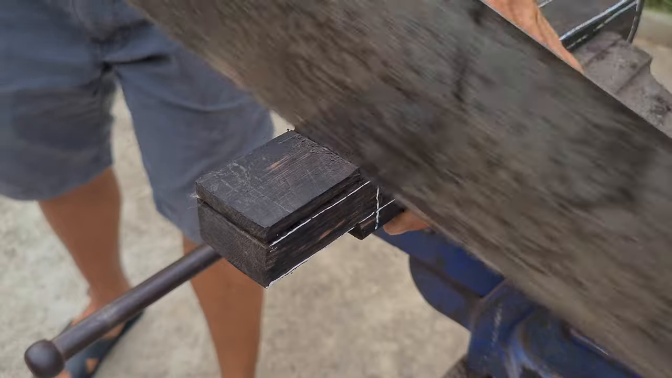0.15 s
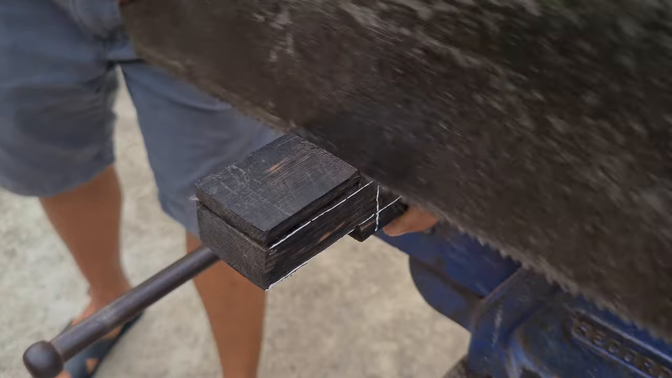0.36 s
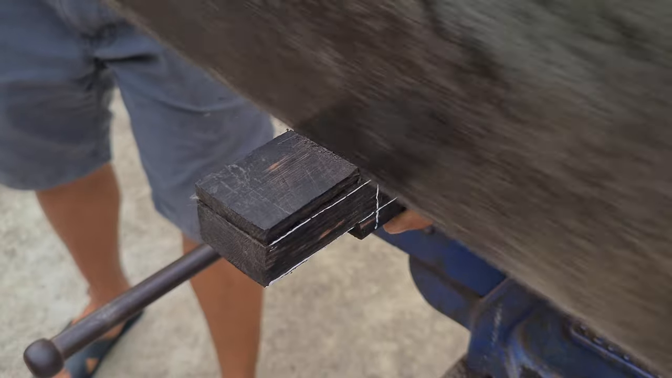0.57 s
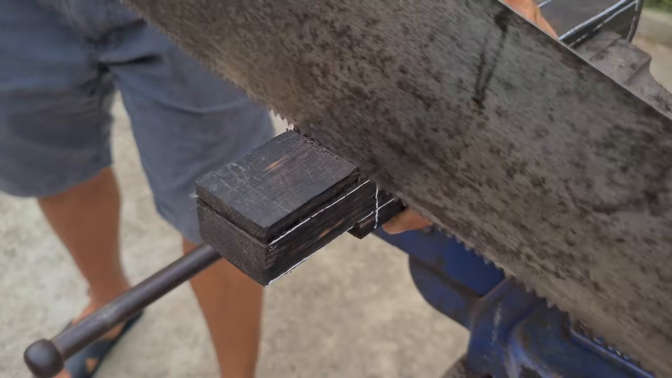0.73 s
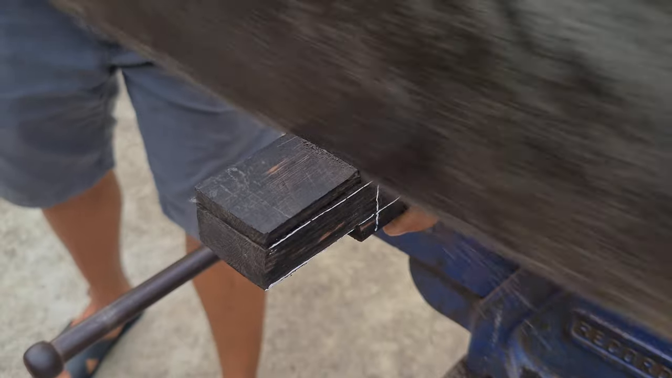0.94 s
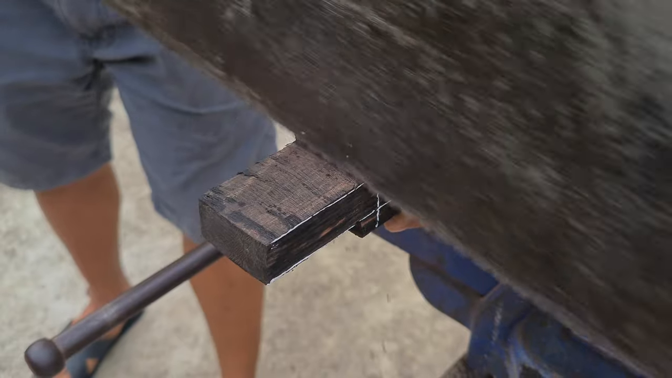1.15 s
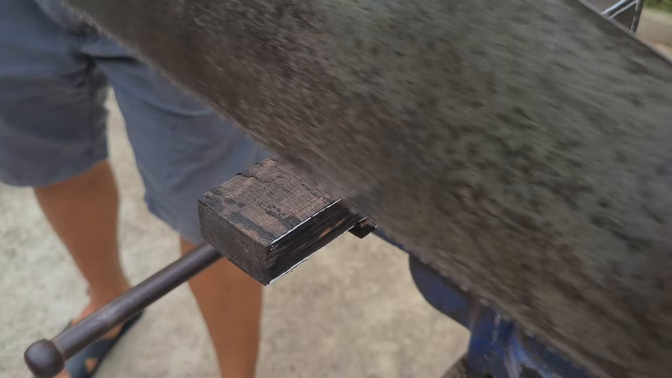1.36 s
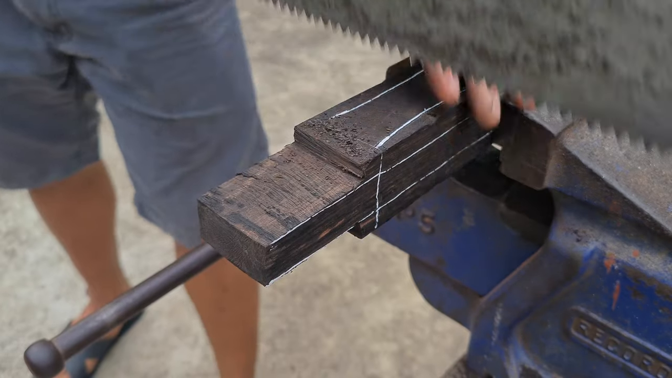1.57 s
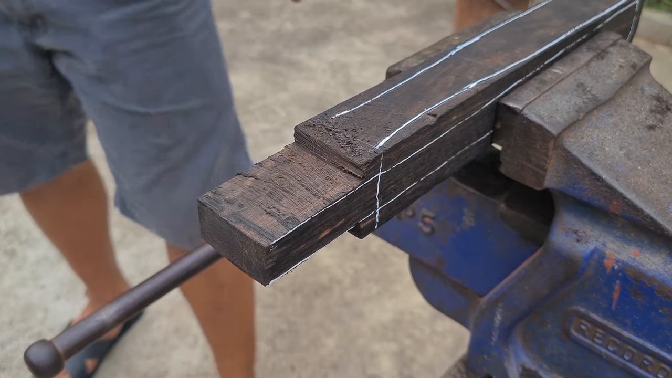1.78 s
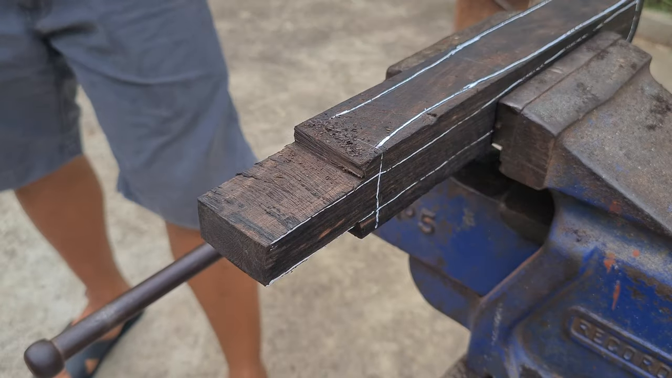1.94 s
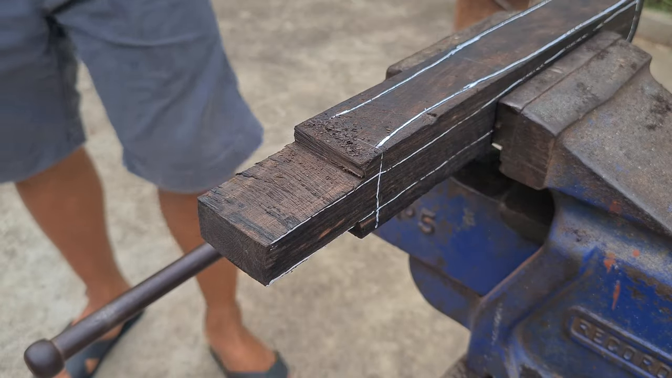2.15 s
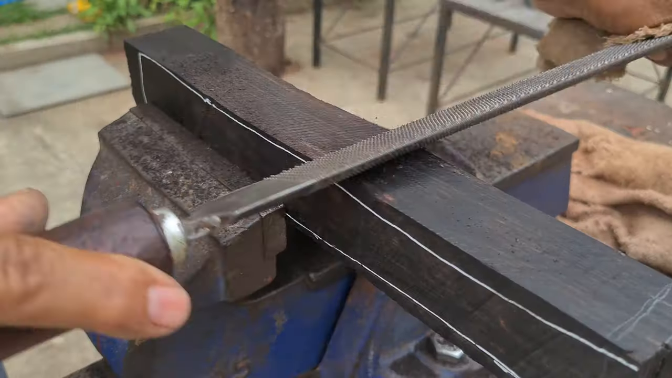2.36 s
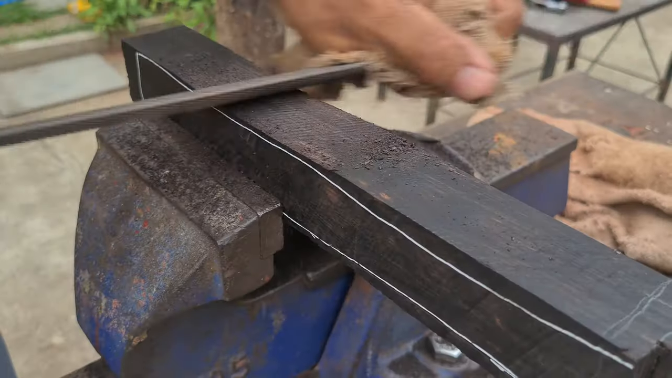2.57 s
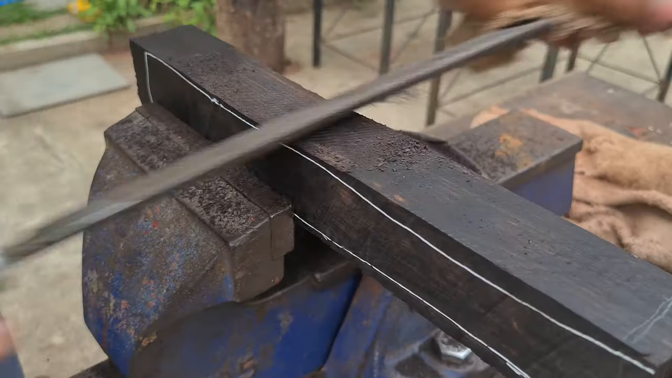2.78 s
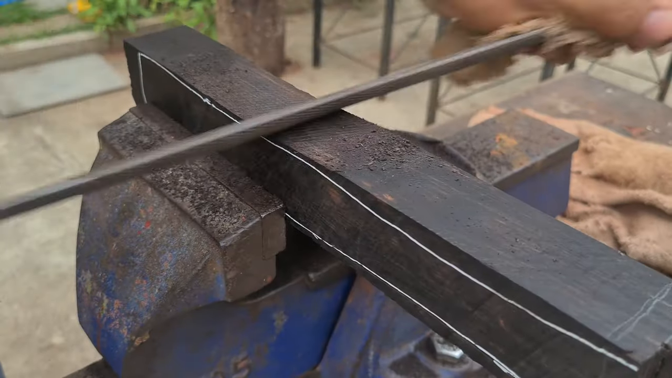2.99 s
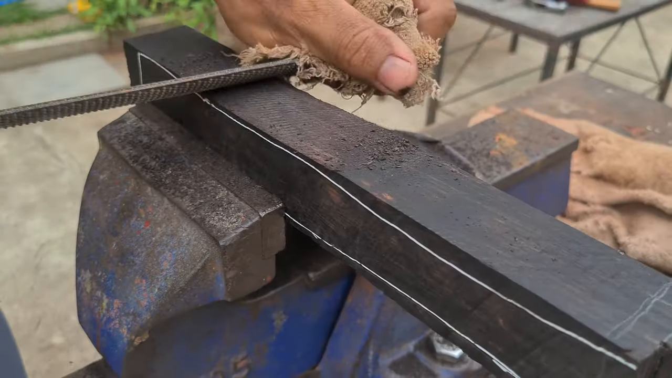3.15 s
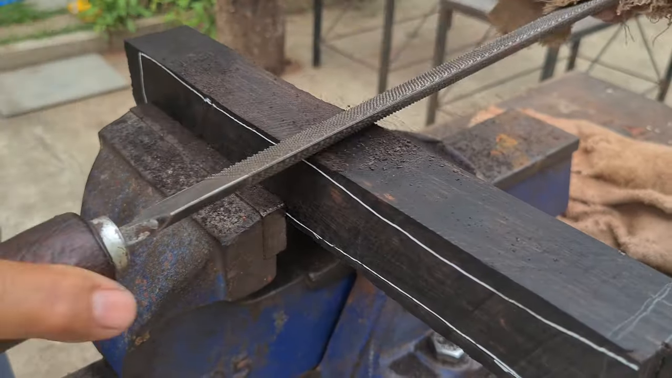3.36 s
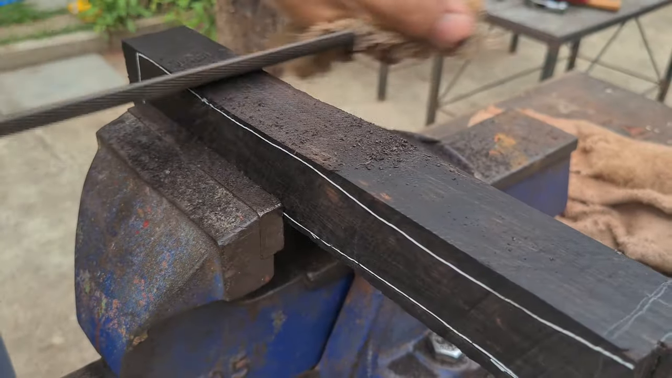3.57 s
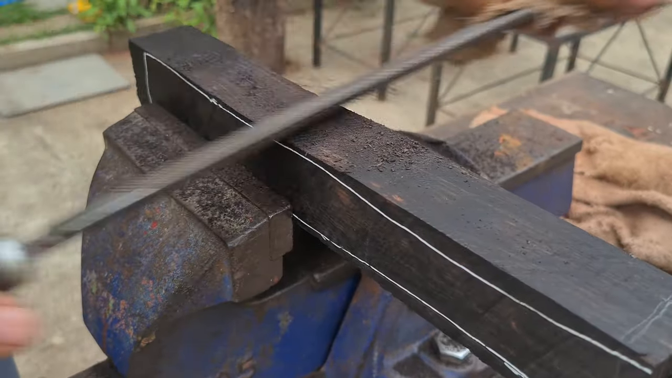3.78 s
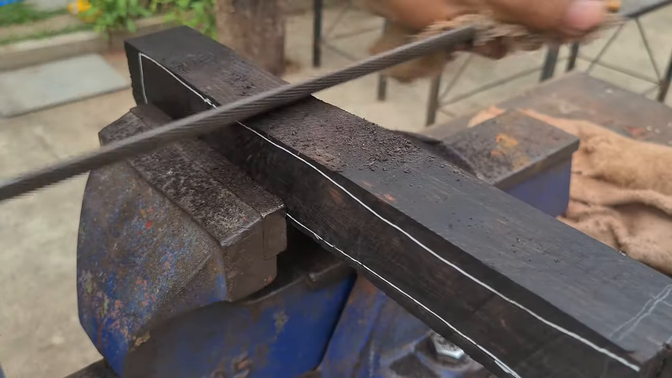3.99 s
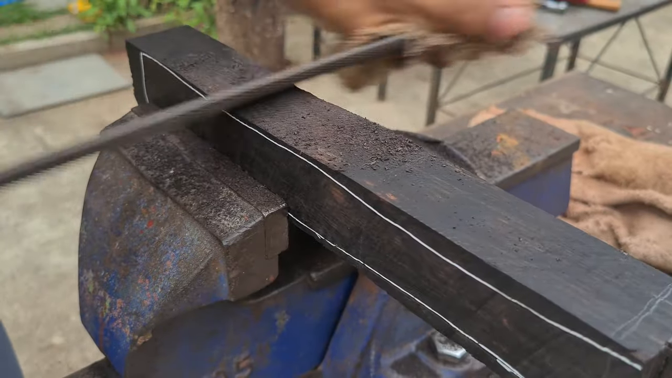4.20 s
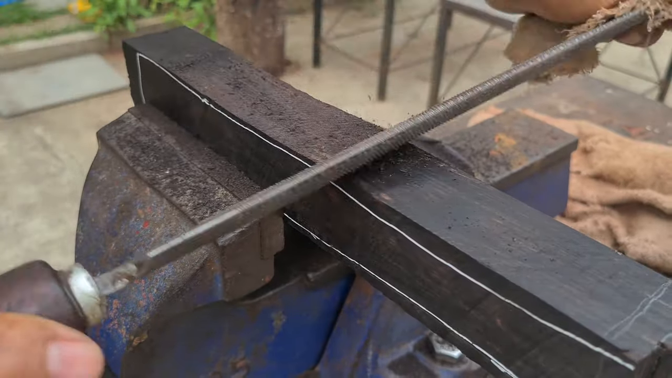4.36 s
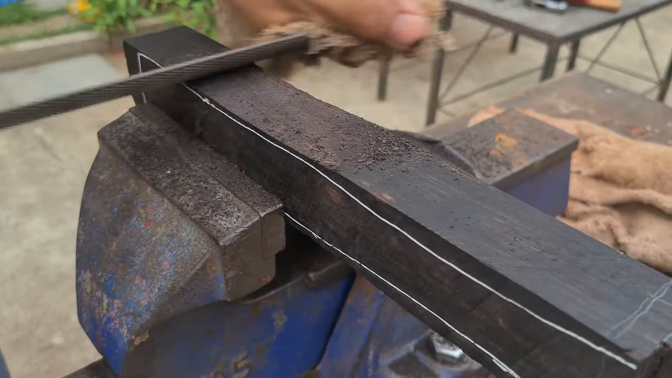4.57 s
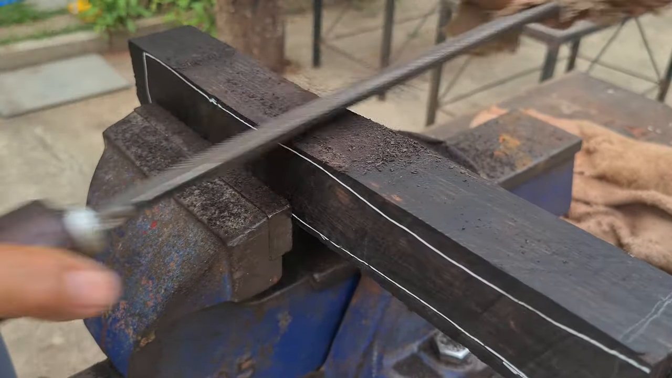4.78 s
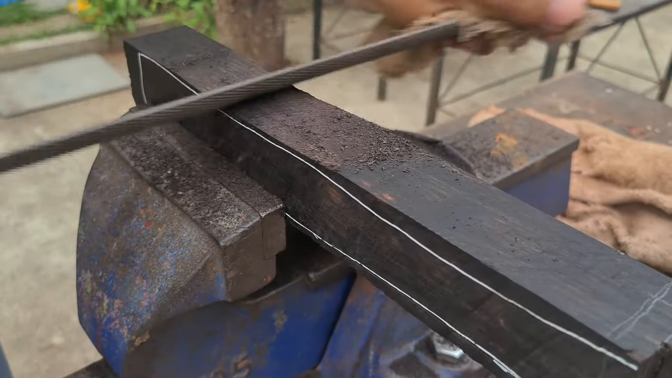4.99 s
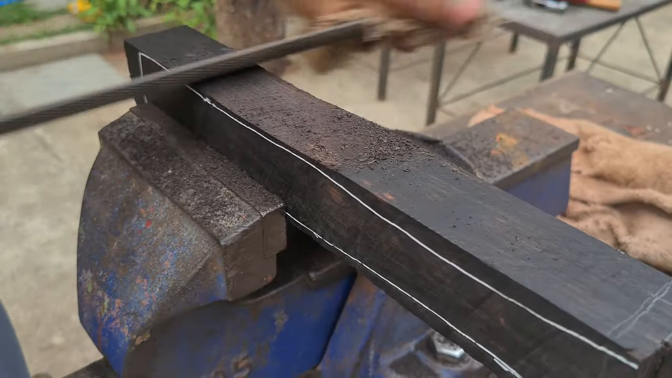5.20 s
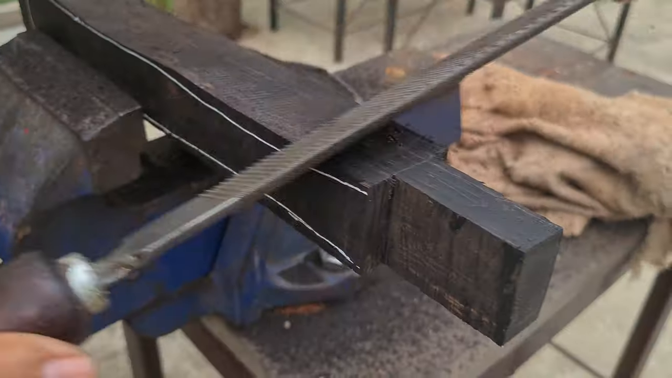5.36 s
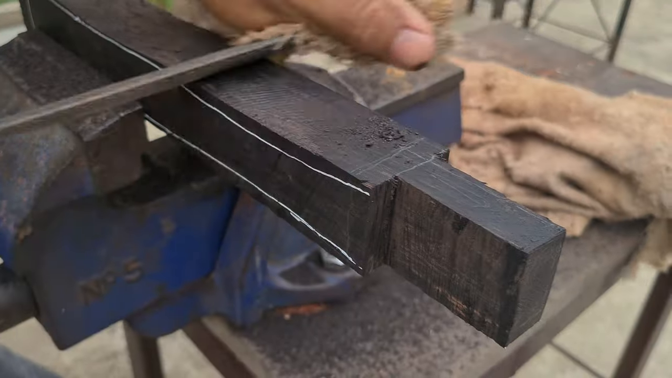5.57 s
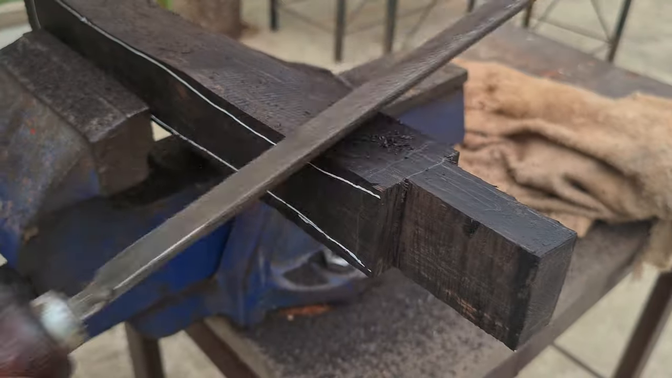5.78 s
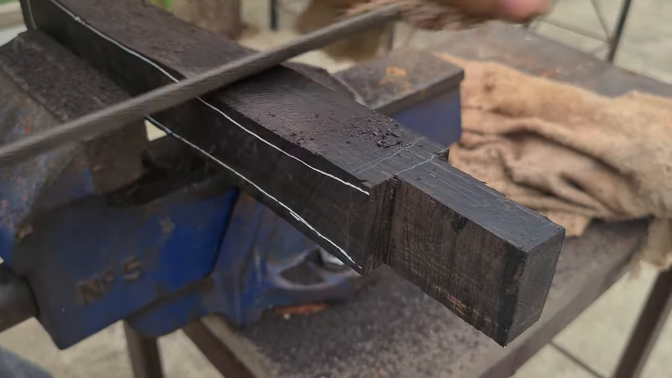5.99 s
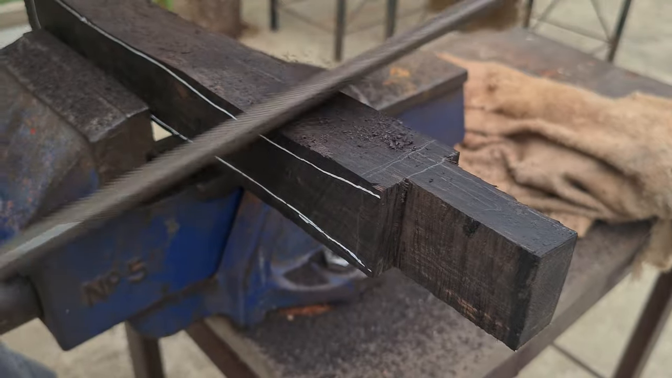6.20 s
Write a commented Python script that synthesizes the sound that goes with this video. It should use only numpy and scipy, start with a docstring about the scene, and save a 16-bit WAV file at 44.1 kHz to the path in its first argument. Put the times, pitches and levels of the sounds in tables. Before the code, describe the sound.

A hand saw rasps loudly through hardwood, the offcut clatters onto paving, then a flat file scrapes in steady strokes over faint traffic.

```python
"""Sawing and filing hardwood outdoors

A hand saw cuts a block held in a vise: random snaps of its teeth drive the wood, the blade and bands of noise.
The offcut drops: short noise cracks on the paving make it ring. Then a flat file rasps across the block,
biting on the push and gliding back, with groaning judders that are falling sine tones.
An engine idles some way off, puff by puff, over a low rumble of traffic made from coloured noise."""
import sys
import numpy as np
from scipy import signal
from scipy.fft import rfft, irfft, next_fast_len
from scipy.io import wavfile

SR = 44100
rng = np.random.default_rng(int(sys.argv[2]) if len(sys.argv) > 2 else 0)


def log_audio(samples):
    """Write samples as a 16-bit WAV file to the path given in sys.argv[1]."""
    # one column per channel
    frames = np.atleast_2d(samples).T
    # limit to full scale, then quantise
    limited = np.clip(frames, -1, 1)
    pcm = np.round(limited * 32767).astype(np.int16)
    wavfile.write(sys.argv[1], SR, pcm)


N = 275173
TIME = np.arange(N) / SR
# frequencies of the filters, with half a second spare for tails
HZ = np.maximum(np.fft.rfftfreq(next_fast_len(N + SR // 2, True), 1 / SR), 1)
JUDDER_SAG_HZ_PER_S, SNAG_DECAY_S, YARD_T60_S, CUTOFF_HZ = 706, 0.0071, 0.4, 15900

# All levels in the tables are relative: the functions add their own gains.
# Far traffic rumble: f/Hz, density/dB per Hz
TRAFFIC_COLOUR = [(18, -13), (32, -7), (42, -8), (55, 7), (70, -4), (87, 0.5), (120, -10.5), (200, -12.5),
                  (400, -24), (1100, -24.5), (2500, -36), (6000, -42), (9000, -54.5), (16000, -71)]
# How alike left and right are: f/Hz, likeness (1 same, 0 unrelated, below 0 opposed)
LIKENESS = [(60, 0.95), (300, 0.92), (640, 0.56), (1400, 0.42), (3000, 0.19), (6500, -0.31), (15000, 0.091)]
# Idling engine: t/s, firings per s, level/dB
ENGINE_IDLE = [(0, 14, -46.5), (2.301, 14.2, -65), (2.6, 14.2, -37), (3.398, 14.4, -38.5),
               (3.698, 13.7, -33), (4.102, 13.7, -30), (4.299, 13.1, -34), (5.35, 13.95, -35),
               (5.7, 18, -46)]
# Exhaust resonances: f/Hz, width/Hz, level/dB, left-right/dB
EXHAUST_MODES = [(66, 6.4, 5.5, -5), (83.5, 11.7, 7, -0.5), (118.3, 11, 4.5, -4)]

# Offcut landing flat, then a weak second burst that renews its ring: t/s, level/dB
LANDINGS = [(1.3603, -16.5), (1.381, -29.5)]
# Offcut skipping on its corners: t/s, level/dB
BOUNCES = [(1.4877, -12.5), (1.4903, -2.5), (1.578, -34), (1.66, -26.5), (1.708, -44)]
# Resonances of offcut, bench, clamped block (sawn, then filed), file and saw blade:
# f/Hz, width/Hz, level/dB, left-right/dB
OFFCUT_MODES = [(340, 30, -1, 0), (1420, 120, -7, 0), (2140, 22, 1, 0), (2560, 45, 2, 0), (2795, 45, 0, 0),
                (4750, 60, -13, 0), (6850, 14, 9, 0), (7375, 40, -7, 0), (8600, 14, 6, 0), (8850, 20, 0, 0),
                (12780, 22, 8, 0)]
BENCH_MODES = [(192, 13.4, 0, -3)]
BLOCK_SAWN_MODES = [(627.6, 34, -0.63, -5), (727, 18, -1.3, 1.5)]
BLOCK_FILED_MODES = [(1117, 15, -1, -1.5), (1160, 34, -13, -5.5)]
FILE_BENDING_MODES = [(1560, 90, -2, -2), (1860, 60, -3, 1), (1985, 70, -1, 2), (2130, 90, -6, 3),
                      (2365, 65, -1, 3), (2650, 50, -4, 3), (2850, 90, -7, 2), (3120, 200, -4, 2)]
FILE_UPPER_MODES = [(3750, 200, -4, 1), (4130, 220, 1, 2), (4860, 220, 0, 2), (5480, 200, -4, 2),
                    (6070, 260, -1, 1), (6430, 80, -1, 1), (7310, 260, -4, 1)]
FILE_STEEL_MODES = [(8940, 110, 0, -2), (10830, 120, 0, -3), (12700, 120, -3, 0)]
SAW_BLADE_MODES = [(3000, 300, -4, 1), (4400, 180, -1, 2), (4720, 130, 0, -2), (6100, 400, -1, 1),
                   (6850, 120, -5, 1), (12700, 110, -2, -2)]

# Saw or file sticking and slipping: t/s at the middle, length/s, f/Hz, level/dB
JUDDERS = [(0.979, 0.017, 1850, -21), (1.139, 0.036, 642.7, -25.5), (2.324, 0.047, 430, -37),
           (2.438, .042, 390, -36.5), (2.835, .054, 465, -37), (2.951, .047, 382, -32.5),
           (4.302, .07, 450, -35), (4.425, .07, 412, -42), (5.236, 0.012, 474, -17.5),
           (5.262, 0.027, 479, -16), (5.29, 0.034, 491, -24), (5.422, .037, 400, -25.5),
           (5.704, 0.0434, 437.3, -11.5), (5.759, 0.044, 402, -22.5), (5.774, .04, 274, -33),
           (5.924, .059, 385, -29.5), (6.183, 0.03, 426, -23)]
# Broad noise colours of file, bench and saw: f/Hz, density/dB per Hz
FILE_RASP = [(150, -44), (450, -24), (850, -26.5), (1300, 0), (1700, -1.5), (2300, 9), (3200, -6),
             (4200, 0.5), (9000, -41)]
FILE_GLIDE = [(150, -1.5), (450, -4.5), (900, -7.5), (1400, 7), (2000, 4), (2450, -19), (3100, -2.5),
              (4200, -16.5), (7000, -38), (12000, -87)]
FILE_HISS = [(2000, -30), (3600, -16), (4800, 1), (6400, 3.5), (8000, -2.5), (9700, -8.5), (12000, -7),
             (13500, -9), (16000, -12.5)]
BENCH_KNOCK = [(100, -36), (220, 5), (300, -5), (420, 2.5), (600, -2.5), (800, -9.5), (1500, -50),
               (5000, -80)]
SAW_TEAR = [(120, 9), (250, 5.5), (450, 12.5), (850, -8.5), (1100, 18), (1350, 13.5), (1550, -0.5),
            (1820, 9), (2300, 0), (3100, -7), (4200, -15.5), (9000, -103)]
SAW_HISS = [(1500, -9.5), (3000, -3), (4000, 0.5), (4800, -4), (5500, 0), (6400, -1), (7800, -1),
            (9200, -10), (12000, -19.5), (16000, -39)]
SAW_SIZZLE = [(6000, -48), (9000, -12.5), (11500, -2), (13000, -4), (16000, -3)]

# Strokes: start t/s, length/s, level/dB, bench level/dB, extra block ring/dB, extra tooth hiss/dB
FILE_PUSHES = [(2.172, 0.24, -29, -44, -1, 1), (2.663, 0.27, -21.5, -37, -1, 0.03),
               (3.164, 0.27, -21, -39.5, -2, 0.32), (3.655, 0.26, -20.5, -38, -0.5, -0.48),
               (4.133, 0.25, -20, -37.5, 1, -0.38), (4.647, 0.25, -19, -36, -4, .5),
               (5.135, 0.25, -20.5, -30.5, -0.5, -0.13), (5.61, 0.25, -22, -24, 5, 0.36),
               (6.074, 0.24, -23.5, -27, 4.5, -0.38)]
FILE_RETURNS = [(1.945, 0.24, -57.5, -71, -5, 1.4), (2.403, .26, -41, -53.5, -4.5, -1.5),
                (2.907, 0.27, -37.5, -43, -5.5, -1.75), (3.412, 0.27, -40, -40.5, -5, -0.94),
                (3.877, 0.31, -41.5, -39, -5, -0.78), (4.368, 0.31, -42.5, -43, -2.5, 0.86),
                (4.888, 0.27, -41, -42.5, -4.5, 1.4), (5.374, 0.26, -41, -34.5, 5.5, 0.4),
                (5.853, 0.25, -43, -32.5, 5, 0.11)]
SAW_PUSHES = [(0.106, 0.31, -16.5, -29.5, 0.5, 1.5), (0.765, .32, -15.5, -34, -4, 1.1)]
SAW_PULLS = [(-.21, 0.32, -27, -20, 1.5, .5), (.449, 0.33, -29, -27, -3.5, 1),
             (1.112, 0.21, -29, -32.5, -3.5, -1.4)]
# How bench, block, wood fibres and teeth (a row each) answer a stroke:
# gain/dB, peak at share of the stroke, sharpness of the swell
FILE_PUSH_SWELL = [(4, 0.58, 5.7), (-1.5, 0.44, 5.5), (1, 0.38, 5.96), (-2, 0.37, 8.4)]
FILE_RETURN_SWELL = [(2.5, 0.19, 0.44), (9.5, 0.41, 1.7), (8.5, 0.44, 2.33), (-1, .53, 2.7)]
SAW_PUSH_SWELL = [(6.5, 0.26, 1.1), (-5, 0.51, 2.25), (-11, 0.57, 2.8), (-3, 0.53, 6.5)]
SAW_PULL_SWELL = [(0, 0.34, 1.3), (6, 0.35, 1.47), (-1.5, 0.46, 1.37), (0.1, 0.44, 2.2)]

# Saw teeth snagging: t/s, change of force/dB
SNAGS = [(0.136, 4.5), (0.189, 1), (0.31, 4), (0.807, -3), (0.864, 9.5), (.997, 1.5), (1.122, 0),
         (1.287, 4)]
# Saw binding in its cut and jolting the work, also as the offcut breaks away:
# t/s at the middle, length/s, bench level/dB, block level/dB, tearing level/dB
BINDS = [(0.185, 0.029, -13, -22.5, -34), (0.336, 0.063, -37, -49, -22.5), (0.524, 0.056, -41, -25, -26.5),
         (0.997, 0.022, -19.5, -20.5, -12.5), (1.033, 0.031, -10.5, -18.5, -19),
         (1.154, 0.052, -53, -17.5, -25.5)]
# Share of the blade beyond the cut: at the start of a push, at its end
BLADE_PAST_CUT = (0.072, 0.945)


def from_db(db):
    """Turn decibels into gain."""
    return 10 ** (np.asarray(db) / 20)


def rms_one(x):
    """Scale to unit power."""
    return x / np.sqrt(np.mean(np.abs(x) ** 2) + 1e-20)


def panned(db):
    """Give left and right gains for a level difference."""
    return from_db(np.array([[db], [-db]]) / 2)


def at_hz(points):
    """Read a table of (Hz, value) along log frequency."""
    hz, value = np.transpose(points)
    return np.interp(np.log(HZ), np.log(hz), value)


def filtered(x, response):
    """Pass a signal through a frequency response."""
    return irfft(rfft(x, 2 * len(HZ) - 2) * response)[..., :N]


def colour(spectrum):
    """Make a broad response of unit power."""
    return rms_one(from_db(at_hz(spectrum)))


def body(modes):
    """Add damped resonances, each with its own left-right balance; unit power."""
    total = 0
    for hz, width, db, pan_db in modes:
        resonance = 1 / (1 + 1j * (HZ - hz * hz / HZ) / width)
        total = total + from_db(db) * panned(pan_db) * resonance
    return rms_one(total)


def drift(rate_hz):
    """Wander slowly at random with spread 1, drawn at every 16th sample."""
    count = N // 16 + 2
    hz = np.fft.rfftfreq(count, 16 / SR)
    slow = irfft(rfft(rng.standard_normal(count)) / (1 + (hz / rate_hz) ** 4), count)
    return np.interp(np.arange(N) / 16, np.arange(count), rms_one(slow))


def spread(pair):
    """Turn two unrelated signals into left and right, most alike in the bass."""
    alike = np.clip(at_hz(LIKENESS), -.99, .99)
    mid, side = filtered(pair, np.sqrt([(1 + alike) / 2, (1 - alike) / 2]))
    return np.array([mid + side, mid - side])


def traffic():
    """A steady far rumble, made from coloured noise."""
    noise = spread(rng.standard_normal((2, N)))
    return from_db(-41.0) * filtered(noise, colour(TRAFFIC_COLOUR)) * panned(-1.2)


def engine():
    """Each firing is a puff, of slightly uneven strength, that rings the exhaust."""
    s, rate, db = np.transpose(ENGINE_IDLE)
    turns = np.cumsum(np.interp(TIME, s, rate)) / SR
    turns -= np.interp(4.110, TIME, turns)  # one firing falls at 4.110 s
    puffs = np.diff(np.floor(turns), prepend=np.floor(turns[0]))
    puffs = puffs * from_db(1.5 * rng.standard_normal(N))
    muffler = 1 / (1 + (HZ / 210) ** 4) / (1 + (38 / HZ) ** 4)
    exhaust = rms_one(filtered(puffs, body(EXHAUST_MODES) * muffler))
    return exhaust * from_db(np.interp(TIME, s, db))


def yard(x, dull_hz):
    """Walls and paving scatter a thin, short tail with softened treble."""
    t = TIME[:SR // 2]
    tail = rng.standard_normal((2, len(t))) * from_db(-60 * t / YARD_T60_S) * (t > .006)
    response = rms_one(rfft(tail, 2 * len(HZ) - 2))
    return filtered(x, response / (1 + (HZ / dull_hz) ** 2))


def contacts(hits, low_hz, high_hz, decay_s):
    """Each burst of wood on paving is a short, gritty crack."""
    out, t = np.zeros((2, N)), TIME[:SR // 8]
    band = signal.butter(2, [low_hz, min(high_hz, .45 * SR)], "band", fs=SR, output="sos")
    fade = np.exp(-t / decay_s)
    for s, db in hits:
        shared = rng.standard_normal(len(t))
        separate = 1.36 * rng.standard_normal((2, len(t)))
        crack = signal.sosfilt(band, (shared + separate) * fade)
        # every crack carries the same energy before its level is set
        even = np.sqrt(np.sum(fade ** 2) / np.sum(crack ** 2, axis=1, keepdims=True))
        at = round(s * SR)
        out[:, at:at + len(t)] += from_db(db) * crack * even
    return out


def offcut():
    """A flat landing gives a dull clack and a crunch, corners give bright ticks; all ring the hard piece."""
    clack = contacts(LANDINGS, low_hz=400, high_hz=1800, decay_s=0.0066)
    crunch = from_db(-4.5) * contacts(LANDINGS, low_hz=1500, high_hz=7730, decay_s=0.018)
    ticks = contacts(BOUNCES, low_hz=3660, high_hz=9400, decay_s=0.0011)
    # the piece's weight behind each tick
    taps = from_db(-24.5) * contacts(BOUNCES, low_hz=500, high_hz=3000, decay_s=.0015)
    # the ticks scatter off the paving
    wash = from_db(-31.0) * contacts(BOUNCES, low_hz=4500, high_hz=14500, decay_s=0.036)
    # the landing rings the lower modes, corners the higher ones
    upper = 1 / (1 + (7800 / HZ) ** 12)
    landing_force = from_db(-14) * clack + from_db(-6) * crunch
    landing_ring = filtered(landing_force, body(OFFCUT_MODES) * (1 - upper))
    corner_ring = filtered(from_db(-5.5) * ticks, body(OFFCUT_MODES) * upper)
    return clack + crunch + ticks + taps + wash + landing_ring + corner_ring


def judders():
    """Stick and slip lock into a short, rough groan that sags in pitch."""
    out, waver = np.zeros(N), drift(90)
    roughness = from_db(2.2 * drift(71))
    for s, length, hz, db in JUDDERS:
        near = np.abs(TIME - s) < 2 * length
        t = TIME[near] - s
        pitch_hz = hz * (1 + 0.028 * waver[near]) - JUDDER_SAG_HZ_PER_S * t
        phase = 2 * np.pi * np.cumsum(pitch_hz) / SR
        slip = np.sin(phase) + from_db(-33) * np.sin(2 * phase)
        fade = np.exp(-np.abs(2 * t / length) ** 3)
        out[near] += np.sqrt(2) * from_db(db) * fade * slip
    return out * roughness * panned(3.5)


def teeth(level_db, peak_snaps_per_s, flutter_hz, flutter_db):
    """Teeth snap fibres at random, more of them in a strong stroke; the contact flutters."""
    stroke_strength = from_db((level_db - level_db.max()) / 3)
    # chance of a snap at each sample, never below one in twenty
    chance = np.clip(peak_snaps_per_s / SR * stroke_strength, .05, 1)
    snaps = (rng.random((2, N)) < chance) * rng.standard_normal((2, N)) / np.sqrt(chance)
    return rms_one(spread(snaps) * from_db(flutter_db * drift(flutter_hz)))


def swell(share, peak_at, sharpness):
    """An arch of height 1: the arm speeds up from rest and slows to rest again."""
    u, p = np.clip(share, 0, 1), np.clip(peak_at, .05, .95)
    return ((u / p) ** p * ((1 - u) / (1 - p)) ** (1 - p)) ** sharpness


def stroke_power(strokes, swells):
    """Power of bench, block, fibres and teeth in time: one swell each per stroke."""
    power = np.full((len(swells), N), 1e-13)
    for s, length, db, bench_db, ring_db, hiss_db in strokes:
        on = (TIME > s) & (TIME < s + length)
        share = (TIME[on] - s) / length
        levels_db = (bench_db, db + ring_db, db, db + hiss_db)
        for k, (gain_db, peak_at, sharpness) in enumerate(swells):
            arch = swell(share, peak_at, sharpness)
            power[k, on] += (from_db(levels_db[k] + gain_db) * arch) ** 2
    return power


def grip_wobble(wobble_db, rate_hz):
    """The hand never presses quite evenly: dB in time."""
    return wobble_db * drift(rate_hz)


def sliding_body(force, modes, sway_db, sway_hz):
    """The contact slides over the nodes of a bar, so each mode swells and fades on its own, at random."""
    powers = np.array([from_db(db) ** 2 * width for hz, width, db, pan_db in modes])
    out = 0
    for mode, share in zip(modes, powers / powers.sum()):
        grip = rms_one(from_db(sway_db * drift(sway_hz)))
        # a mode radiates little far above its own pitch
        response = body([mode]) / (1 + (HZ / mode[0] / 2) ** 4)
        out = out + np.sqrt(share) * filtered(force * grip, response)
    return out


def flat_file():
    """Fine teeth rasp the block and ring the steel bar, which also sounds in the light return."""
    power = stroke_power(FILE_PUSHES, FILE_PUSH_SWELL) + stroke_power(FILE_RETURNS, FILE_RETURN_SWELL)
    wobble = grip_wobble(wobble_db=1.07, rate_hz=18)
    bench_db, block_db, rasp_db, hiss_db = 10 * np.log10(power) + wobble
    force = teeth(hiss_db, peak_snaps_per_s=42000, flutter_hz=121, flutter_db=1.5)
    grit = teeth(hiss_db, peak_snaps_per_s=42000, flutter_hz=114, flutter_db=0.0)
    bite = np.clip((hiss_db + 43.5) / 13, 0, 1)  # 0 while the teeth glide, 1 while they cut

    bench = filtered(force * from_db(bench_db), from_db(-8.0) * body(BENCH_MODES))
    knock = filtered(grit * from_db(bench_db - 4.0), colour(BENCH_KNOCK))
    block_response = body(BLOCK_FILED_MODES) / (1 + (HZ / 2500) ** 4)
    block = filtered(force * from_db(block_db - .5), block_response)
    cutting = filtered(grit * np.sqrt(bite) * from_db(rasp_db - 4.5), colour(FILE_RASP))
    gliding = filtered(grit * np.sqrt(1 - bite) * from_db(rasp_db - 3.0), colour(FILE_GLIDE))
    # hiss grows faster than the stroke level
    hiss = filtered(grit * from_db(1.235 * hiss_db + 2.0), colour(FILE_HISS)) * panned(4.0)

    # the bar bends more as the teeth bite; its highest modes ring even under a light touch
    bend_force = force * from_db(rasp_db - 3.5 + 3 * bite)
    bending = sliding_body(bend_force, FILE_BENDING_MODES, sway_db=4, sway_hz=12)
    upper = sliding_body(force * from_db(hiss_db - .5), FILE_UPPER_MODES, sway_db=4, sway_hz=12)
    steel_force = force * from_db(.75 * hiss_db - 18.5)
    steel = sliding_body(steel_force, FILE_STEEL_MODES, sway_db=4.5, sway_hz=14)
    return bench + knock + block + cutting + gliding + hiss + bending + upper + steel


def bind_power():
    """Each bind is a short surge in bench, block and fibres; the teeth hiss no louder."""
    power = 0
    for s, length, *levels_db in BINDS:
        surge = np.exp(-(2 * (TIME - s) / length) ** 2)
        power = power + np.outer([*from_db(levels_db) ** 2, 0], surge)
    return power


def blade_echo(x, round_trip_s, echo_db):
    """Waves return from the blade's tip, later the further it is pushed, so the rasp's colour slides."""
    drawn, pushed = BLADE_PAST_CUT
    turns = [(row[0], drawn) for row in SAW_PUSHES] + [(row[0], pushed) for row in SAW_PULLS]
    last_pull = SAW_PULLS[-1]
    turns.append((last_pull[0] + last_pull[1], drawn))
    travel = np.interp(TIME, *np.transpose(sorted(turns)))
    echo = np.array([np.interp(TIME - round_trip_s * travel, TIME, side) for side in x])
    return (x + from_db(echo_db) * echo) / np.sqrt(1 + from_db(echo_db) ** 2)


def saw():
    """The teeth shake bench and block, tear the wood, hiss in the cut and ring the blade."""
    power = stroke_power(SAW_PUSHES, SAW_PUSH_SWELL) + stroke_power(SAW_PULLS, SAW_PULL_SWELL)
    wobble = grip_wobble(wobble_db=0.85, rate_hz=28)
    bench_db, block_db, tear_db, hiss_db = 10 * np.log10(power + bind_power()) + wobble
    # each snag changes the force at once, then dies away
    snag_db = sum(db * (TIME >= s) * np.exp(-np.abs(TIME - s) / SNAG_DECAY_S) for s, db in SNAGS)
    force = teeth(hiss_db, peak_snaps_per_s=22000, flutter_hz=150, flutter_db=1.0) * from_db(snag_db)

    bench = filtered(force * from_db(bench_db - 6.5), body(BENCH_MODES))
    block = filtered(force * from_db(block_db), body(BLOCK_SAWN_MODES))
    rasp = blade_echo(force, round_trip_s=.0018, echo_db=-9)
    tear = filtered(rasp * from_db(tear_db - 1.5), colour(SAW_TEAR))
    hiss = filtered(rasp * from_db(hiss_db - 3.5), colour(SAW_HISS))
    # the blade radiates from its other face, so the sides of the force are swapped
    blade_force = force[::-1] * from_db(hiss_db - 8)
    blade = sliding_body(blade_force, SAW_BLADE_MODES, sway_db=5, sway_hz=14)
    # the finest crackle fades as the cut opens up
    sizzle_db = hiss_db + np.interp(TIME, [.3, .9, 1.2], [1.5, -.5, -2.5])
    sizzle = filtered(rasp * from_db(sizzle_db), colour(SAW_SIZZLE)) * panned(-4)
    return bench + block + tear + hiss + blade + sizzle


def scene():
    """Tools close by, the offcut on the ground, the street behind."""
    background = traffic() + engine()
    clatter = offcut()
    tools = judders() + flat_file() + saw()
    echoes = from_db(-17) * yard(tools, dull_hz=6000) + from_db(-14) * yard(clatter, dull_hz=18000)
    return background + echoes + clatter + tools


def record(dry):
    """The highest peaks are rounded, then the top of the treble is cut steeply."""
    rounded = dry / (1 + dry ** 4) ** .25
    return filtered(rounded, 1 / (1 + (HZ / CUTOFF_HZ) ** 400))


dry = scene()
out = record(dry)
log_audio(out)
```